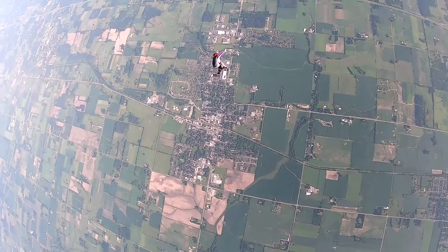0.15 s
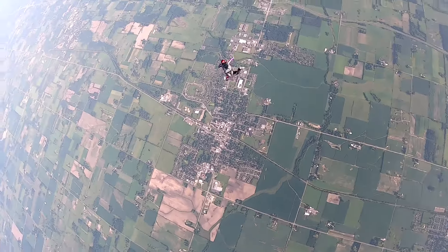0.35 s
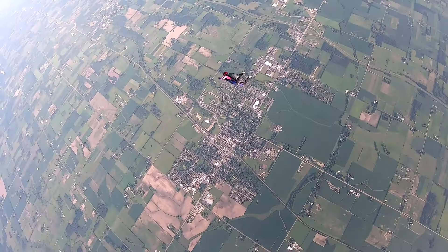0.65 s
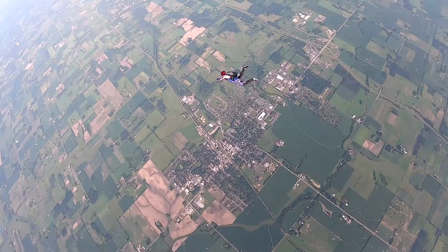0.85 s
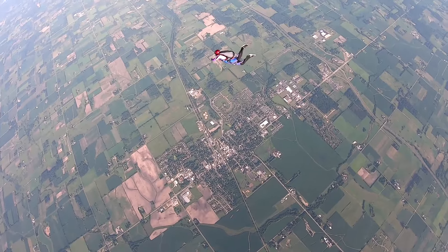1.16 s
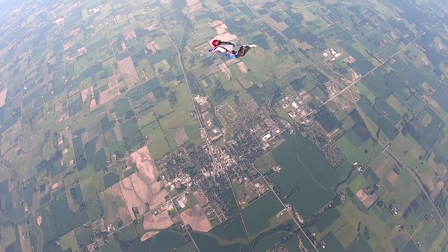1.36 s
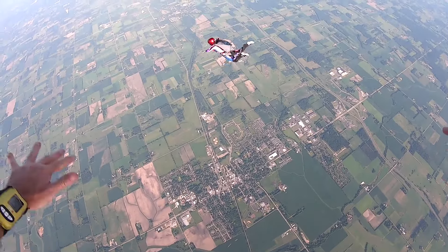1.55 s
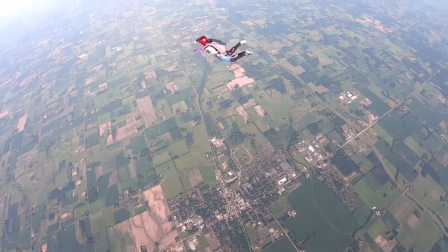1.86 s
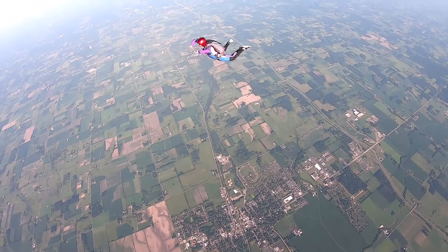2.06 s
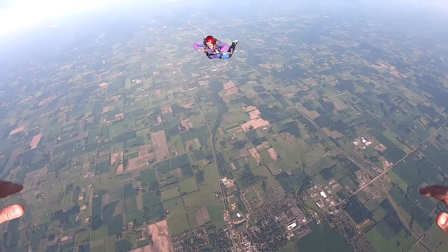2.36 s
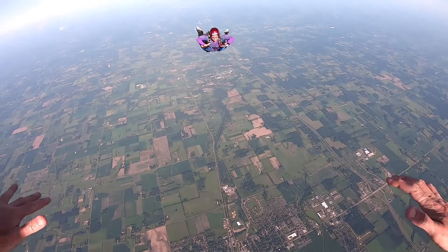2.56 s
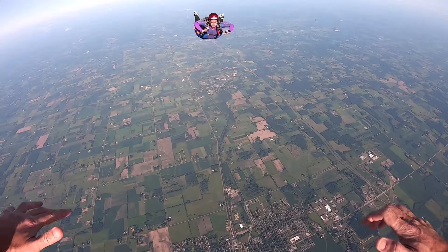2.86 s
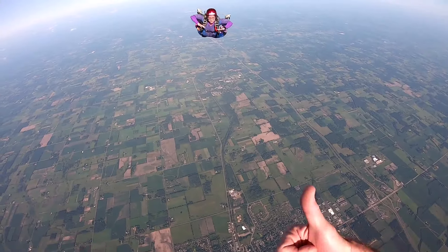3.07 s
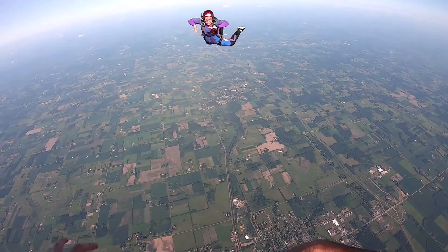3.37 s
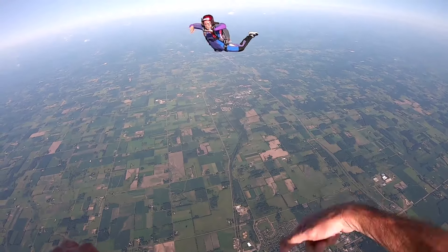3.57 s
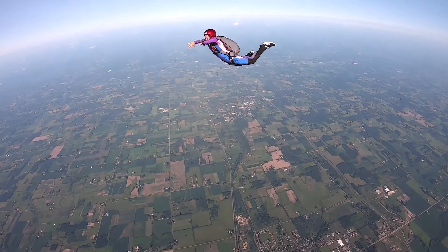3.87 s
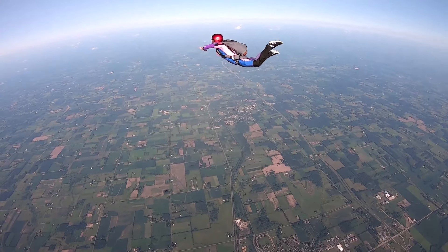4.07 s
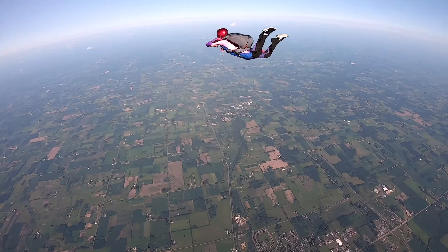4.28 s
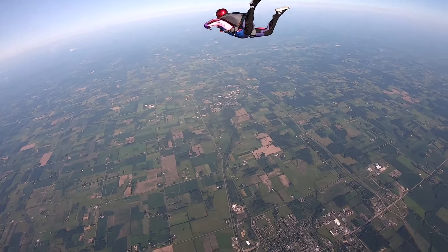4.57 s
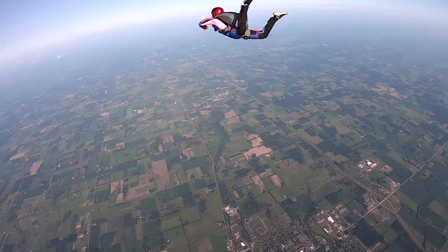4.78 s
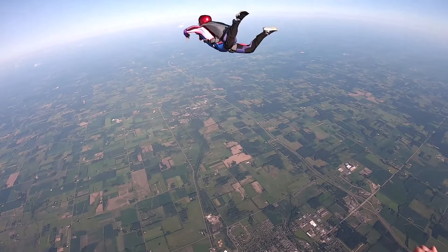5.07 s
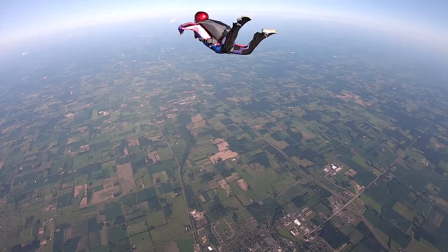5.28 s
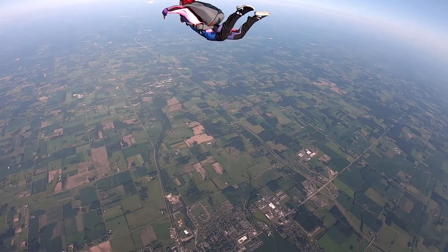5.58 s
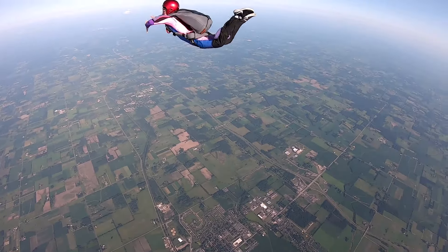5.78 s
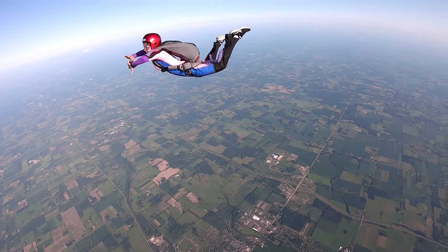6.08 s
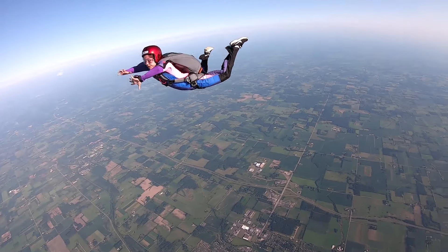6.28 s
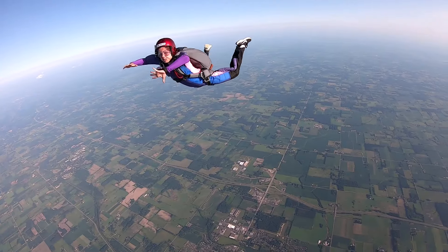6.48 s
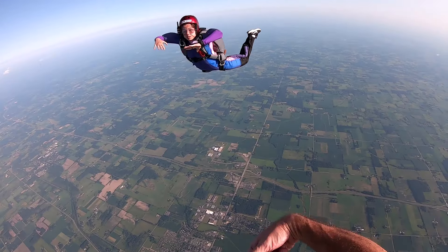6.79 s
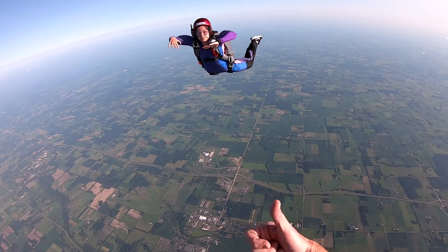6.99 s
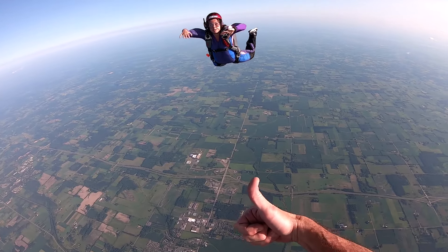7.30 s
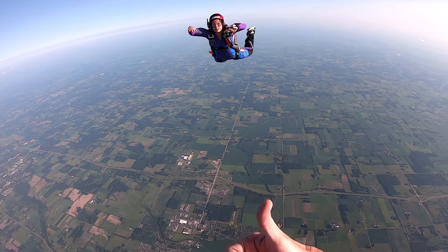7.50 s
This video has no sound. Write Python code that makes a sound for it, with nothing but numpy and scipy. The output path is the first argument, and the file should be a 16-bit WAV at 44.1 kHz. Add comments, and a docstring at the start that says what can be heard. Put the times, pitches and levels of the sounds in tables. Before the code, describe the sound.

A skydiver in freefall, heard from a microphone on the helmet: only wind, loud, close and dry, without echo. From 0 to about 1.7 s the air streams fairly smoothly, a bright rush with a breathy, hollow whistling tone in the middle-high range, over heavy low buffeting and rumble; it strengthens near 0.9 s. From 1.7 s the flow starts to tear and the steady rush thins. By 3 s it is choppy, with pitched, raspy puffs swelling and snapping off in small crackles, leaving tiny gaps. A marked dip falls at 3.3 s, then a gust at 3.4 s. Around 4.1 s a hard gust hits, and from there the flutter is dense, about ten bursts a second. It nearly drops out at 5.0 s, gusts strongly at 5.5 to 6 s, swells at 6.8 s, dips at 7.1 s and keeps sputtering with sharper snaps until the cut at about 7.6 s.

```python
"""A bright rush of wind with a singing tone over deep buffeting: freefall at a microphone on a skydiver's helmet.
Smooth flow is shaped noise and blows the port's cavity, a noise-driven resonance; the housing rings with it.
As the skydiver tilts, the flow tears loose: eddies, about ten a second, swell as pitched noise, snap off
with a crack of filtered spikes and leave brief lulls. Gusts raise the levels and stalls lower them."""
import sys
import numpy as np
from scipy import signal
from scipy.fft import rfft, irfft, next_fast_len
from scipy.io import wavfile
from scipy.ndimage import uniform_filter1d, minimum_filter1d, map_coordinates

SR = 44100
rng = np.random.default_rng(int(sys.argv[2]) if len(sys.argv) > 2 else 0)


def unload_wav(signal):
    """Save mono or channel-first audio to the path in sys.argv[1] as 16-bit WAV at rate SR, clipped to [-1, 1]."""
    wavfile.write(
        sys.argv[1],
        SR,
        np.round(np.clip(np.atleast_2d(signal).T, -1, 1) * 32767).astype(np.int16),
    )


N = 336924


def amp(db):
    """Level: the amplitude gain of a number of decibels."""
    return 10 ** (np.asarray(db) / 20)


def unit(x):
    """Normalisation: x at an rms of 1."""
    return x / np.sqrt(np.mean(x ** 2) + 1e-20)


def curves(rows):
    """Linear interpolation: one value per sample for each column after the time."""
    s, *columns = np.transpose(rows)
    return [np.interp(np.arange(N) / SR, s, column) for column in columns]


def wobble(rate):
    """Band-limited randomness: a smooth curve through random knots, rate of them a second."""
    knots = rng.standard_normal(int(N * rate / SR) + 4)
    return map_coordinates(knots, [np.arange(N) * rate / SR])


def filtered(x, response):
    """Linear filtering: the spectrum of x times a response of frequency."""
    size = next_fast_len(N + 8192)
    hz = np.fft.rfftfreq(size, 1 / SR)
    return irfft(rfft(x, size) * response(hz), size)[:N]


def coloured(x, spectrum):
    """Spectral shaping: x through (Hz, dB) points joined on a log-frequency axis, at an rms of 1."""
    points_hz, points_db = np.transpose(spectrum)

    def response(hz):
        return amp(np.interp(np.log(hz + 1), np.log(points_hz), points_db, left=-120, right=-120))

    return unit(filtered(x, response))


def steadied(x, size):
    """Envelope normalisation: x with its loudness evened out over size samples."""
    power = x ** 2
    local_power = np.abs(uniform_filter1d(power, size=size))
    return x / np.sqrt(local_power + 1e-3 * power.mean())


def blend(a, b, share):
    """Power addition: two unrelated noises mixed at constant power; share is the part of b."""
    share = np.clip(share, 0, 1)
    return np.sqrt(1 - share) * a + np.sqrt(share) * b


def turbulence(spectrum, grain_db):
    """Turbulent noise: countless tiny whirls of uneven strength sum to shaped noise, at an rms of 1."""
    grain = amp(grain_db * wobble(900))
    return coloured(rng.standard_normal(N) * grain, spectrum)


def resonance(centre_hz, width_hz):
    """Noise-driven resonance: slow noise modulates a carrier whose pitch may move, at an rms of 1."""
    skirt = lambda hz: 1 / (1 + (2 * hz / width_hz) ** 2)
    a, b = [filtered(rng.standard_normal(N), skirt) for _ in range(2)]
    phase = 2 * np.pi * np.cumsum(centre_hz) / SR
    return unit(a * np.cos(phase) + b * np.sin(phase))


# narrow resonances of the housing: centre_hz, width_hz, gain_db (against the direct sound)
HOUSING_MODES = [(602, 34, -5.5), (1092, 140, -2.5), (2130, 69, 0), (3325, 69, -4.5)]


def housing(x):
    """Modal resonance: the housing rings briefly at its narrow modes, added to the direct sound."""
    def response(f):
        modes = [amp(db) * 1j * f * w / (c * c - f * f + 1j * f * w) for c, w, db in HOUSING_MODES]
        return 1 + sum(modes)

    return filtered(x, response)


# relative spectrum of a crack, of a tiny whirl or an eddy: frequency_hz, gain_db
CRACK_SPECTRUM = [(700, -19.5), (1300, 3), (2200, 7), (2800, 6.5), (3500, -8), (4200, -3.5), (5200, -0.5),
                  (6100, -18), (8000, -14.5), (9000, -27.5), (11000, -33.5), (15800, -40.5)]


def spits(flow_db, rate, level_db, life_s):
    """Impulsive noise: tiny whirls snap at random and die exponentially, as hard as the flow at that moment."""
    starts = (rng.random(N) < rate / SR) * rng.uniform(0.29, 1, N)
    puffs = unit(signal.lfilter([1], [1, -np.exp(-1 / (life_s * SR))], starts))
    return amp(level_db + flow_db) * coloured(puffs * rng.standard_normal(N), CRACK_SPECTRUM)


# steady airstream, base levels before trims: time_s, rush_db, hiss_db, rumble_db, roar_db
FLOW_LEVELS = [(0, -31, -50.5, -36.5, -41), (.5, -32.5, -52.5, -33, -43), (.9, -26.5, -54.5, -37, -42),
               (1.68, -28, -56, -35, -45.5), (1.85, -32.5, -63, -35.5, -48), (2.6, -36, -69.5, -41.5, -44),
               (3.15, -33, -65.5, -49.5, -45.5), (4.0, -35, -72, -51.5, -47.5),
               (4.6, -35.5, -67.5, -50.5, -51), (5.3, -33.5, -66, -49.5, -47), (6.1, -34, -67, -49.5, -48),
               (7.64, -32, -67.5, -50.5, -46.5)]
# port cavity blown by the flow, base level before trim: time_s, level_db, resonance_hz
CAVITY_TONE = [(0, -30.5, 1473), (1.7, -30, 1580), (1.9, -35.5, 1521), (2.4, -34, 1439), (2.8, -37.5, 1793),
               (4.25, -34.5, 1760), (4.6, -42, 1605), (6.0, -45, 1410), (6.3, -43.5, 1131)]
# relative spectra of the roar, the rush of smooth flow, that of torn flow, and the hiss: frequency_hz, gain_db
ROAR_SPECTRUM = [(380, -20), (520, -3.5), (610, -2), (690, -0.5), (830, 1), (950, -0.5), (1300, -1),
                 (2200, -36.5)]
SMOOTH_RUSH_SPECTRUM = [(500, -46), (780, -37), (950, -17.5), (1100, -15.5), (1450, 3.5), (1900, 3.5),
                        (2150, -3.5), (2400, -2), (2900, -11.5), (3350, -9.5), (4200, -23), (5100, -22.5),
                        (6200, -33), (9000, -63.5)]
TORN_RUSH_SPECTRUM = [(500, -44), (780, -25), (950, -13), (1100, -5.5), (1450, 4), (1900, -0.5),
                      (2150, -2.5), (2400, -8.5), (2900, -17.5), (3350, -15.5), (4200, -28), (5100, -32),
                      (6200, -54), (9000, -64.5)]
HISS_SPECTRUM = [(2000, -15.5), (3300, 11.5), (4200, 4.5), (5100, 2.5), (6200, -3), (7200, 0), (8300, -3.5),
                 (8950, -16), (9700, -17), (10800, -8), (12500, -17), (14000, -26), (15800, -39)]
HISS_PER_LIFT = 1.07  # dB for each dB that a gust lifts the rush


def airstream(torn, lift_db, roar_lift_db, lull_db):
    """Flow noise: roar, rush, hiss and cavity flutter together, harder and recoloured once the flow tears."""
    rush_db, hiss_db, _, roar_db = curves(FLOW_LEVELS)
    cavity_db, cavity_hz = curves(CAVITY_TONE)
    flutter_db = (.5 + .5 * torn) * (2.0 * wobble(55) + 1.77 * wobble(160))
    flutter_db = flutter_db + 0.83 * torn * wobble(11) + lull_db
    roar = amp(roar_db + roar_lift_db + 1.3 * flutter_db) * turbulence(ROAR_SPECTRUM, grain_db=0.5)
    flow_db = rush_db + lift_db + flutter_db
    smooth_rush = turbulence(SMOOTH_RUSH_SPECTRUM, grain_db=0.5)
    torn_rush = turbulence(TORN_RUSH_SPECTRUM, grain_db=1.0)
    rush = amp(flow_db - 2.22) * blend(smooth_rush, torn_rush, torn)
    cavity = amp(cavity_db - 0.5 + flutter_db) * resonance(cavity_hz, width_hz=310)
    hiss_db = hiss_db + HISS_PER_LIFT * lift_db + flutter_db + 0.2 * lull_db + 0.48 * wobble(110)
    hiss = amp(hiss_db + 7) * turbulence(HISS_SPECTRUM, grain_db=-1.0)
    tiny_whirls = spits(flow_db, rate=45, level_db=-25.0, life_s=0.00097)
    return housing(roar + rush + cavity + hiss + tiny_whirls)


# relative spectra of the deep noise of the large whirls and of the rumble: frequency_hz, gain_db
BUFFET_SPECTRUM = [(12, -25.5), (25, -6), (45, -1), (80, 1.5), (130, 0.5), (180, -0.5), (225, -10),
                   (275, -26.5), (350, -29.5), (600, -60.5)]
RUMBLE_SPECTRUM = [(150, -25.5), (230, 2), (290, -1.5), (380, -4), (470, -8.5), (580, -19.5), (900, -45)]
# gain of the deep bass within the buffeting: time_s, gain_db
DEEP_BASS_GAIN = [(0, -2), (1.2, -1.5), (2.2, 3.5), (3.7, 2.5), (4.4, -2), (7.64, 1)]
DEEP_BASS_HZ = 70  # half-amplitude corner
BUFFET_SMOOTH_DB, BUFFET_TORN_DB = -21, -23  # base levels in smooth and torn flow
BUFFET_PER_LIFT = 0.26  # dB for each dB that a gust lifts the rush
THROB_HZ, THROB_WIDTH_HZ, THROB_DB = 172.9, 61, -31  # base level in fully torn flow


def buffeting(torn, lift_db, rumble_lift_db, lull_db):
    """Pressure fluctuation: large whirls push as deep noise, softly limited; a throb and a lumpy rumble join."""
    gust_db = BUFFET_PER_LIFT * lift_db
    buffet_db = BUFFET_SMOOTH_DB + torn * (BUFFET_TORN_DB - BUFFET_SMOOTH_DB) + gust_db + .15 * lull_db
    # the noise is levelled, then its strongest swings are softly limited
    push = np.tanh(0.49 * steadied(turbulence(BUFFET_SPECTRUM, grain_db=0.2), size=7000))
    push = coloured(push, [(8, 0.0), (230, 1.5), (330, -18.5), (600, -40.5)])
    deep = filtered(push, lambda hz: 1 / (1 + (hz / DEEP_BASS_HZ) ** 4))
    rebalanced = push - deep + amp(curves(DEEP_BASS_GAIN)[0]) * deep
    buffet = amp(buffet_db + 0.62 * wobble(14)) * rebalanced
    throb = steadied(resonance(np.full(N, THROB_HZ), THROB_WIDTH_HZ), size=4000)
    throb = amp(THROB_DB + 0.39 * lull_db + gust_db) * torn * throb
    rumble_db = curves(FLOW_LEVELS)[2] + rumble_lift_db + 2.5 + 2.0 * wobble(35) + 1.1 * lull_db
    rumble = amp(rumble_db) * turbulence(RUMBLE_SPECTRUM, grain_db=1.5)
    # torn flow rumbles lower
    duller = filtered(rumble, lambda hz: np.minimum(amp(2.5), (hz / 320 + 1e-3) ** -2.2))
    return buffet + throb + (1 - torn) * rumble + torn * duller


# gusts that strike the port, peak lifts: start_s, length_s, rush_lift_db, rumble_lift_db, roar_lift_db
GUST_EVENTS = [(0.505, .27, 0, 5, 1), (3.41, .35, 3, 5.5, 4), (4.134, 0.13, 10.5, 19.5, 11),
               (4.798, 0.099, 1, 15, 2), (5.48, .15, 10.5, 18, 6), (5.676, 0.37, 5, 10.5, 2),
               (6.235, 0.067, 0.5, 9.5, 3), (6.802, 0.33, 2, 3.5, 4)]
GUST_ATTACK_S, GUST_RELEASE_S, GUST_SAG = 0.017, 0.11, 0.24  # sag: share of the lift lost by the end


def gusts():
    """Amplitude envelope: each gust lifts rush, rumble and roar (in dB) quickly, sags and lets go."""
    t, lifts = np.arange(N) / SR, np.zeros((3, N))
    for s, length, *lift_db in GUST_EVENTS:
        corners_s = [-GUST_ATTACK_S / 2, GUST_ATTACK_S / 2, length, length + GUST_RELEASE_S]
        shape = np.interp(t - s, corners_s, [0, 1, 1 - GUST_SAG, 0])
        lifts += np.outer(lift_db, shape)
    return lifts


# large eddies torn off at the port, levels before trims: snap_s, level_db, crack_db, pitch_hz, swell_s
LARGE_EDDIES = [(1.732, -24.5, -48, 1740, 0.013), (1.803, -25, -53.5, 1670, 0.012),
                (1.868, -21.5, -50.5, 1640, 0.0061), (2.128, -29.5, -48.5, 1710, 0.008),
                (2.465, -33.5, -48.5, 1600, 0.024), (2.687, -27.5, -52, 1810, 0.012),
                (2.877, -22.0, -53.5, 1750, 0.018), (2.897, -27.5, -51.5, 1750, 0.0053),
                (2.997, -28, -45, 1870, 0.0074), (3.02, -27.0, -55, 1670, 0.024),
                (3.112, -21.5, -49.5, 1840, 0.023), (3.125, -27, -55, 1770, 0.009),
                (3.198, -28, -47.5, 1870, 0.0059), (3.264, -20, -48, 1890, 0.0095),
                (3.774, -22, -49, 1790, 0.02), (3.984, -22.5, -48, 1790, 0.017),
                (4.022, -26, -53, 1700, 0.004), (4.075, -22, -41.5, 1800, 0.015),
                (4.308, -17, -47, 1700, 0.0044), (4.35, -25, -52, 1700, 0.014),
                (4.381, -23.5, -54, 1660, 0.013), (4.448, -23, -48, 1690, 0.022),
                (4.526, -20.5, -48, 1590, 0.019), (4.584, -22, -41.5, 1780, 0.0079),
                (4.666, -23, -40, 1850, 0.011), (4.791, -23.0, -44, 1700, 0.0098),
                (4.816, -24.5, -53.5, 1730, 0.012), (4.969, -21.5, -48, 1640, 0.029),
                (5.041, -23, -50, 1550, 0.0072), (5.106, -23, -44, 1680, 0.0079),
                (5.25, -25, -48.5, 1670, 0.019), (5.314, -21, -50, 1770, 0.012),
                (5.409, -22, -39.5, 1700, 0.017), (5.472, -26.0, -51, 1691, 0.006),
                (5.657, -28, -48.5, 1630, 0.011), (5.723, -22.5, -44, 1820, 0.015),
                (5.822, -24, -48, 1760, 0.008), (5.865, -31.5, -54.5, 1605, 0.0055),
                (5.945, -21, -44, 1820, 0.0091), (5.987, -23, -47, 1720, 0.004),
                (6.07, -27, -48.5, 1610, 0.021), (6.107, -22, -44, 1710, 0.004),
                (6.209, -23.0, -43.5, 1580, 0.0062), (6.292, -26.5, -61, 1390, 0.0074),
                (6.456, -25.5, -47, 1640, 0.0087), (6.478, -25.5, -53.5, 1810, 0.012),
                (6.644, -22, -45, 1910, 0.013), (6.755, -22, -48, 1800, 0.01),
                (7.003, -25, -43.5, 1830, 0.022), (7.061, -22, -48.5, 1890, 0.004),
                (7.204, -21.5, -38.5, 1860, 0.021), (7.3, -20.5, -46.5, 1820, 0.004),
                (7.332, -24, -52, 1500, 0.0064), (7.413, -23.5, -40, 1910, 0.009),
                (7.569, -24.5, -58, 1800, 0.0032)]
SMALL_PER_S = 5  # in fully torn flow, before those too close to a large eddy are left out
SMALL_DB, SMALL_SPREAD_DB = -31.5, 1  # mean level before trim, standard deviation
SMALL_HZ, SMALL_SWELL_S = 1649, 0.0072  # median pitch, swell time
SMALL_CRACK_DB = -24  # mean, relative to the eddy's level
CLEAR_S = .04  # no small eddy forms this close to a large one


def shedding(torn, count):
    """Vortex shedding: the large eddies, and small ones at random where the flow is torn, in order of time."""
    chance, scatter = rng.random((count, 2)), rng.standard_normal((count, 3))
    length_s = N / SR
    rows = list(LARGE_EDDIES)
    for (when, luck), (strength, pitch, crack) in zip(chance, scatter):
        s = when * length_s
        clear = all(abs(s - large[0]) > CLEAR_S for large in LARGE_EDDIES)
        if clear and luck < torn[int(when * N)] * SMALL_PER_S * length_s / count:
            db = SMALL_DB + SMALL_SPREAD_DB * strength
            crack_db = db + SMALL_CRACK_DB + 3 * crack
            rows.append((s, db, crack_db, SMALL_HZ * np.exp(.1 * pitch), SMALL_SWELL_S))
    return sorted(rows, key=lambda row: row[0])


def eddy_shapes(shed, fall_s, crest, crack_rise_s, crack_fall_s, lull_s, lull_db):
    """Vortex growth and collapse: a swell to a sharp crest, a crack, and a lull that deepens with strength."""
    swell, snap, lull = np.zeros((3, N))
    for s, db, crack_db, _, rise_s in shed:
        span = np.arange(max(0, int((s - .15) * SR)), min(N, int((s + .15) * SR)))
        before, after = np.maximum(s - span / SR, 0), np.maximum(span / SR - s, 0)
        cusp = np.exp(-before / crack_rise_s - after / crack_fall_s)
        hump = np.exp(-(before / max(rise_s, 1e-3)) ** 1.5 - (after / fall_s) ** 2)
        swell[span] += amp(db) * (hump + crest * cusp)
        snap[span] += amp(crack_db) * cusp
        # an eddy at -22.5 dB leaves a lull of lull_db, deepest lull_s after the snap
        age = (after / lull_s) ** 2
        lull[span] += lull_db * amp(db + 22.5) * age * np.exp(1 - age)
    return swell, snap, lull


HOOT_SHARE, HOOT_PER_DB = 0.23, 0.14  # share of power at the pivot, and its growth per dB
HOOT_PIVOT_DB = 23.5  # the further an eddy stands above its crack, the more it hoots


def eddies(shed, swell, snap):
    """Vortex sound: a rasp of rush and a short hoot at the eddy's pitch, with a crack of sharp spikes."""
    level_db, crack_db, centre_hz, _ = curves(shed)  # gliding from one eddy to the next
    hoot_share = HOOT_SHARE + HOOT_PER_DB * (level_db - crack_db - HOOT_PIVOT_DB)
    hoot = np.tanh(resonance(centre_hz, width_hz=380))
    hoot = coloured(hoot, [(500, -28), (1100, -0.5), (2300, -9), (3200, -39.0)])
    torn_rush = turbulence(TORN_RUSH_SPECTRUM, grain_db=1.0)
    rasp = blend(resonance(centre_hz, width_hz=680), torn_rush, share=0.51)
    rasp = coloured(rasp, [(400, -20), (800, -8.5), (1100, -1.5), (2200, 2.5), (2900, 3.5),
                           (3500, 4.5), (6000, 0.5), (12000, -17.5)])
    body = steadied(blend(rasp, hoot, hoot_share), size=400)
    spikes = (rng.random(N) < 3000 / SR) * np.sign(rng.standard_normal(N))  # 3000 a second
    crack = snap * steadied(spikes, size=160)
    crack = np.std(crack) * coloured(crack, CRACK_SPECTRUM)  # colouring keeps the overall level
    return housing(amp(-1.33) * swell * body + amp(15) * crack)


# moments when the flow stalls: centre_s, depth_db (negative, before each layer's weighting)
STALL_EVENTS = [(3.3, -11), (4.56, -3), (4.73, -2.5), (5.005, -7), (6.14, -2), (7.085, -4.5)]
STALL_S = 0.03  # from the centre to 1/e of the depth


def stalls():
    """Flow stall: the airstream's level dips along a bell curve, in dB."""
    t = np.arange(N) / SR
    return sum(db * np.exp(-((t - s) / STALL_S) ** 2) for s, db in STALL_EVENTS)


# how far the flow has torn loose: time_s, share (0-1)
TORN_SHARE = [(.7, 0.01), (1.7, .3), (2.9, 1)]


def scene():
    """Superposition: airstream, buffeting and eddies add up on one microphone, under gusts and stalls."""
    torn, = curves(TORN_SHARE)
    lift_db, rumble_lift_db, roar_lift_db = gusts()
    shed = shedding(torn, count=150)
    swell, snap, lull_db = eddy_shapes(shed, fall_s=0.0065, crest=0.63, crack_rise_s=0.0012,
                                       crack_fall_s=0.0019, lull_s=0.032, lull_db=-4.5)
    lull_db = lull_db + stalls()
    low = buffeting(torn, lift_db, rumble_lift_db, lull_db)
    stream = airstream(torn, lift_db, roar_lift_db, lull_db)
    return (low + stream + eddies(shed, swell, snap))[None]


TOP_HZ = 15800  # upper band limit


def record(dry):
    """Peak and band limiting: a smoothed gain holds down the highest peaks, then all above TOP_HZ is cut."""
    ceiling = .35
    needed = np.minimum(1, ceiling / (np.abs(dry[0]) + 1e-9))
    gain = uniform_filter1d(minimum_filter1d(needed, size=120), size=120)
    return filtered(dry[0] * gain, lambda hz: hz < TOP_HZ)[None]


dry = scene()
out = record(dry)
unload_wav(out)
```